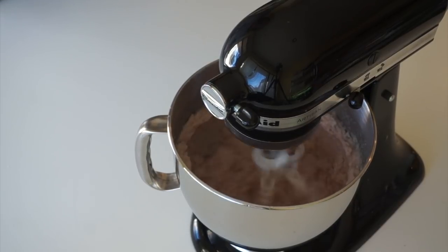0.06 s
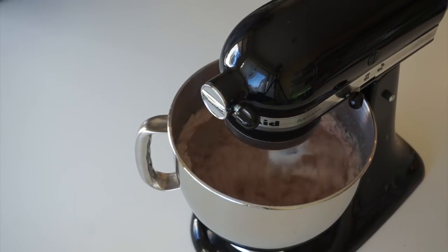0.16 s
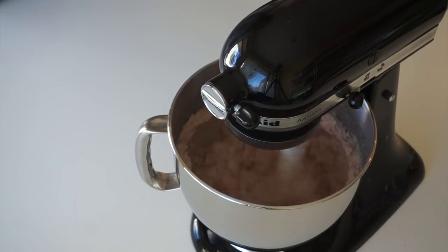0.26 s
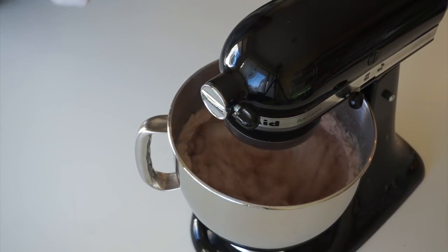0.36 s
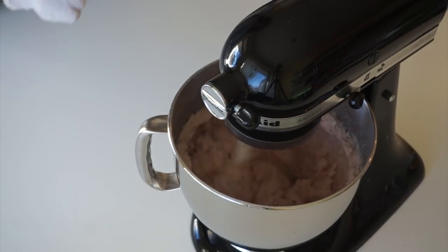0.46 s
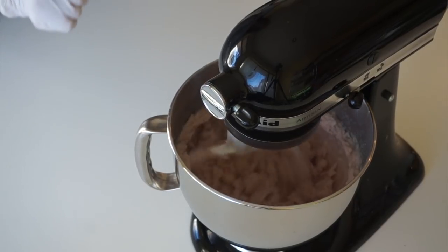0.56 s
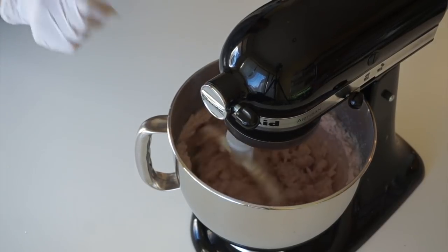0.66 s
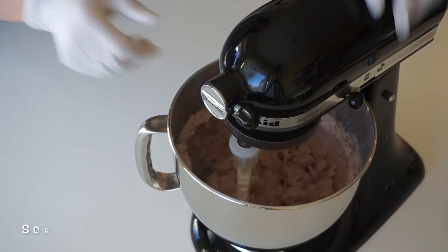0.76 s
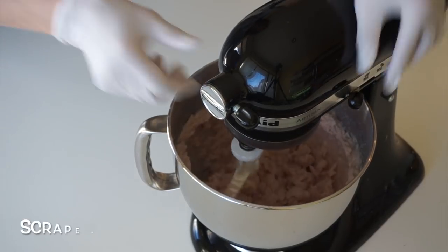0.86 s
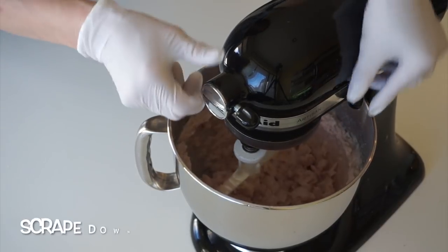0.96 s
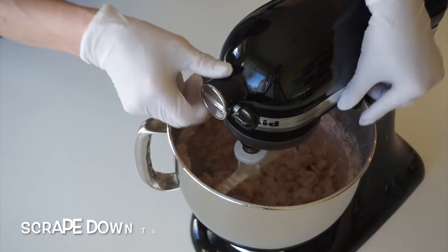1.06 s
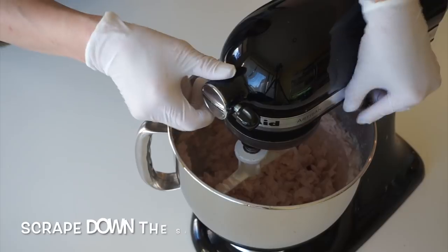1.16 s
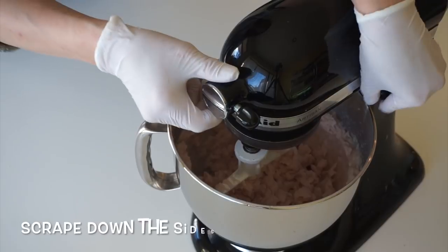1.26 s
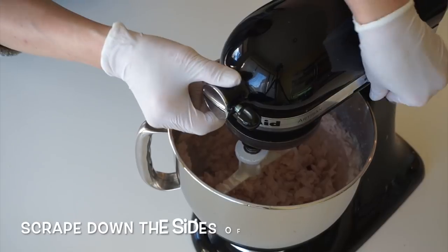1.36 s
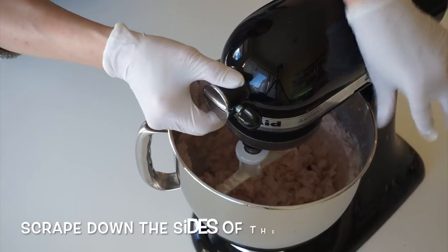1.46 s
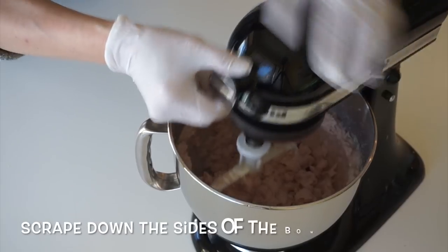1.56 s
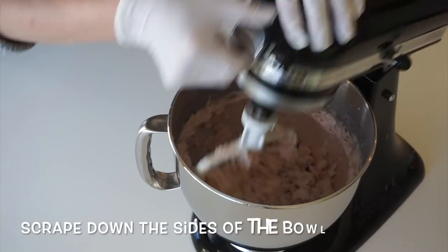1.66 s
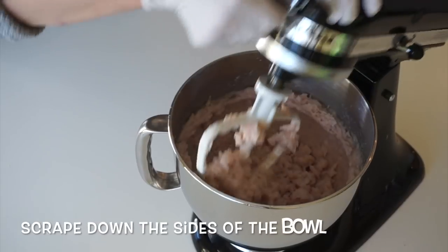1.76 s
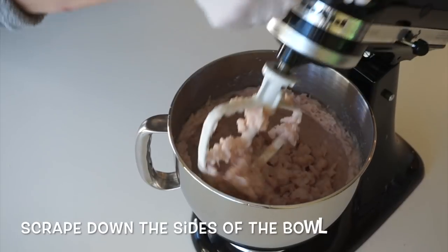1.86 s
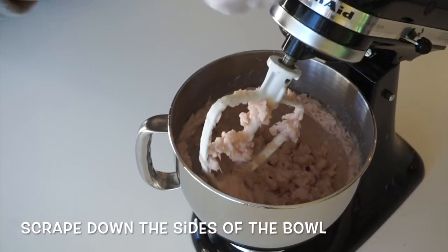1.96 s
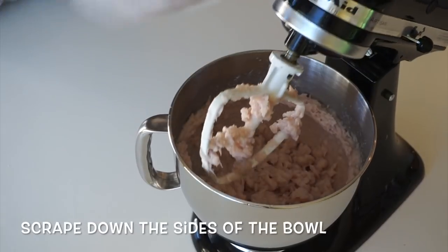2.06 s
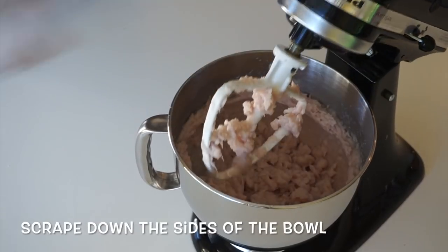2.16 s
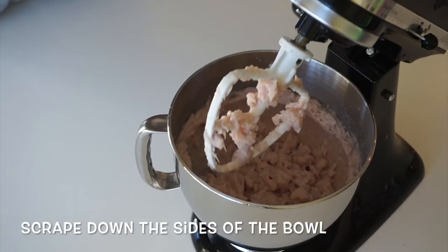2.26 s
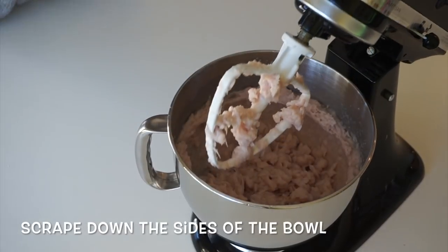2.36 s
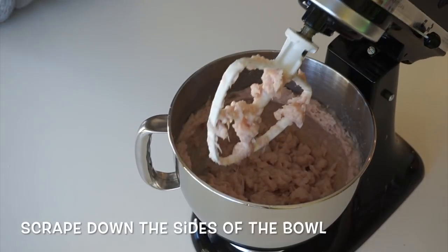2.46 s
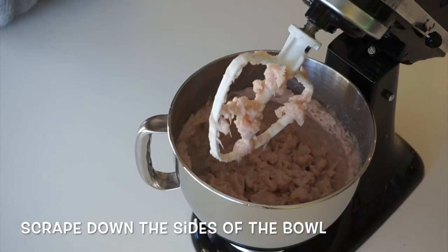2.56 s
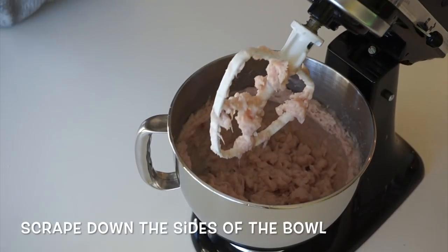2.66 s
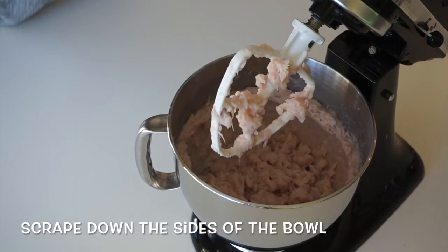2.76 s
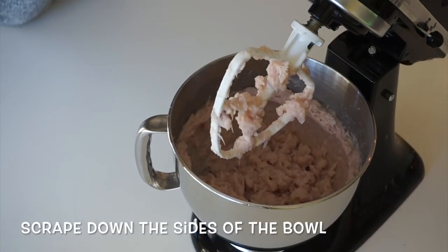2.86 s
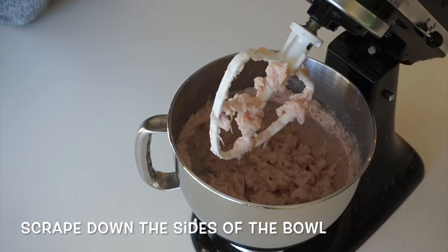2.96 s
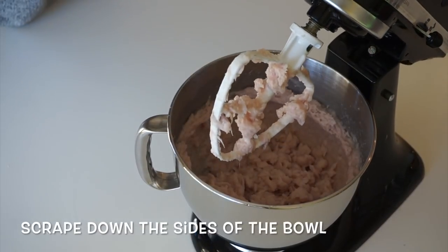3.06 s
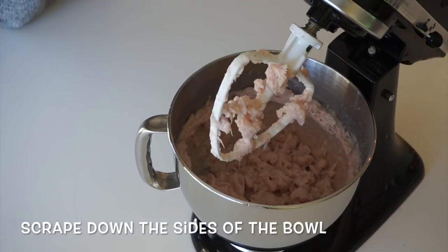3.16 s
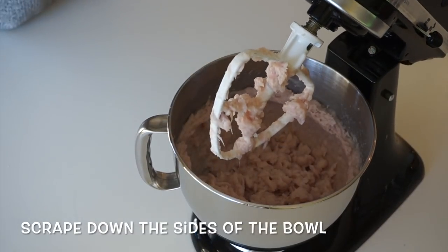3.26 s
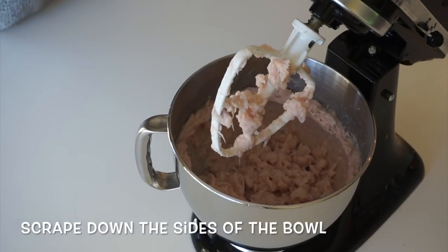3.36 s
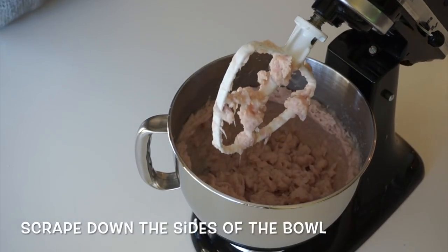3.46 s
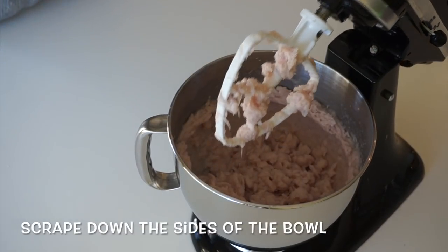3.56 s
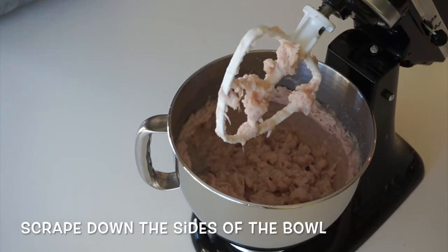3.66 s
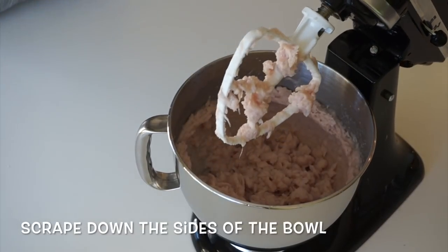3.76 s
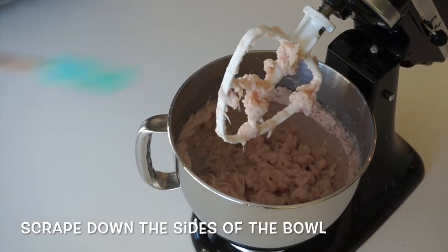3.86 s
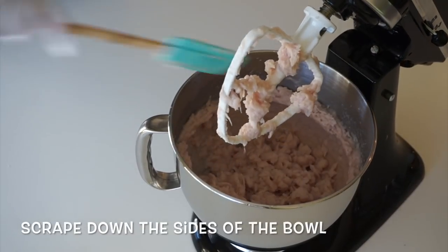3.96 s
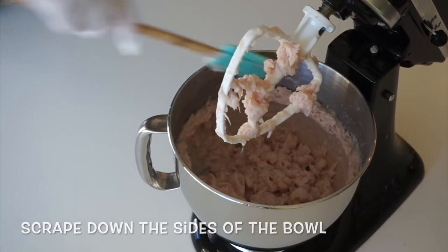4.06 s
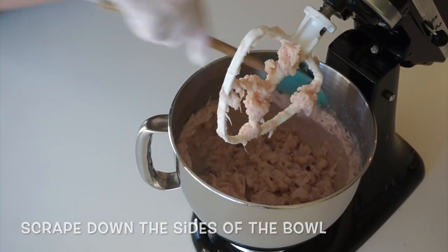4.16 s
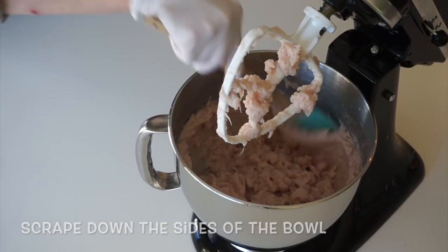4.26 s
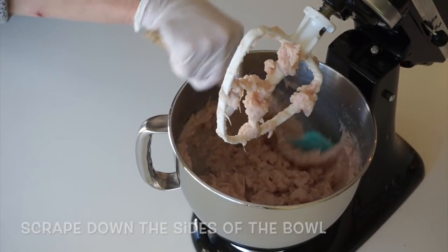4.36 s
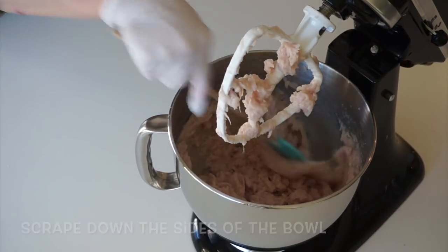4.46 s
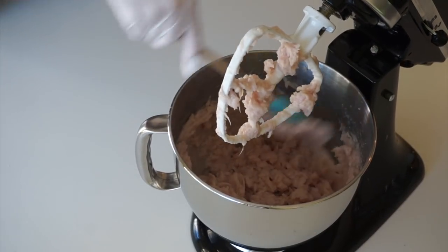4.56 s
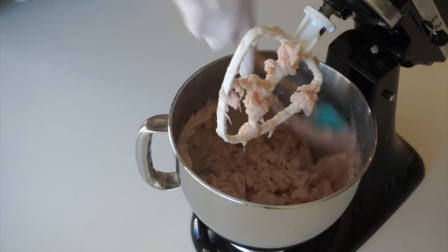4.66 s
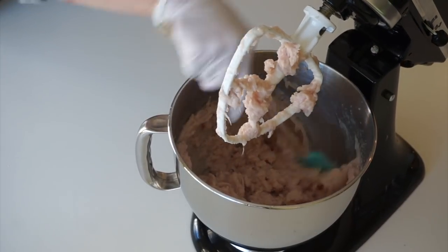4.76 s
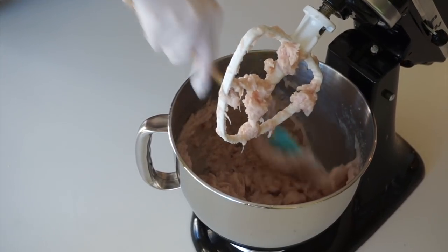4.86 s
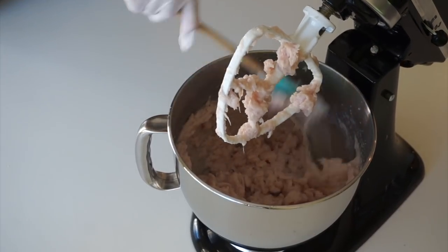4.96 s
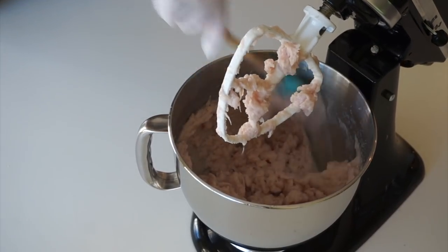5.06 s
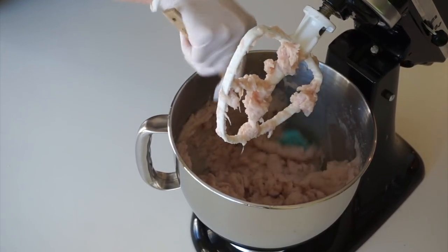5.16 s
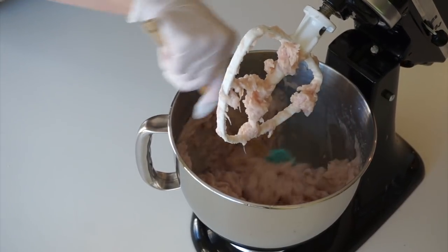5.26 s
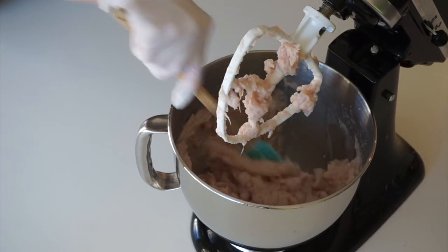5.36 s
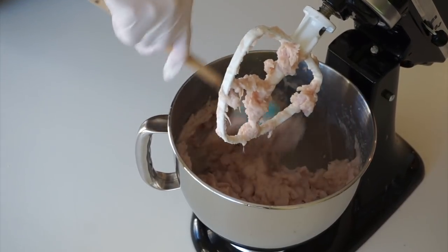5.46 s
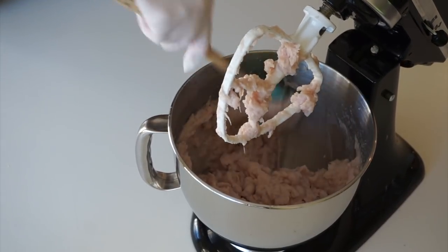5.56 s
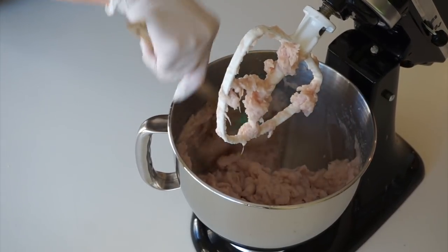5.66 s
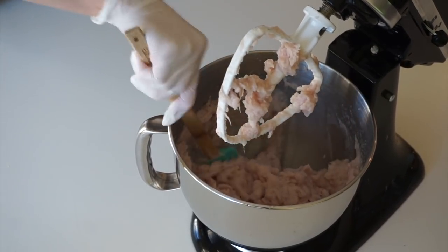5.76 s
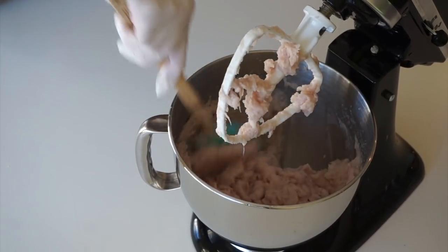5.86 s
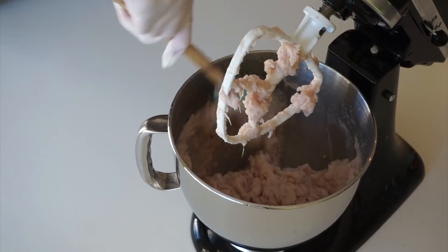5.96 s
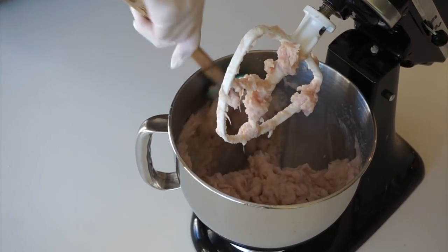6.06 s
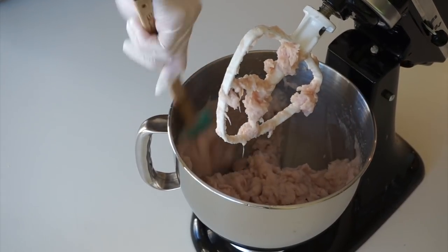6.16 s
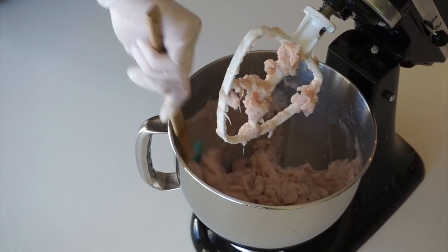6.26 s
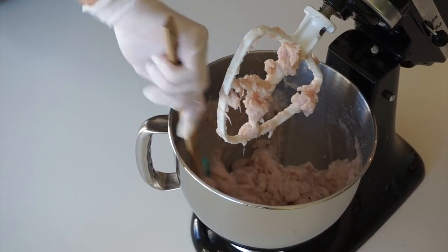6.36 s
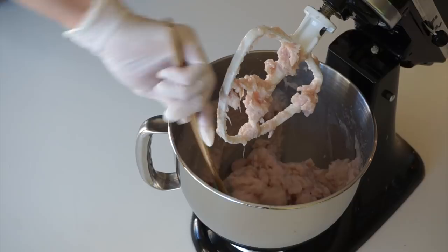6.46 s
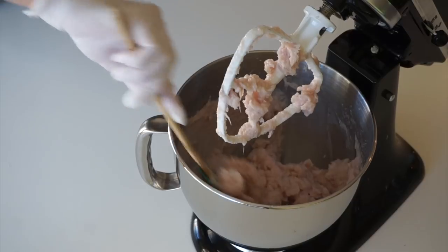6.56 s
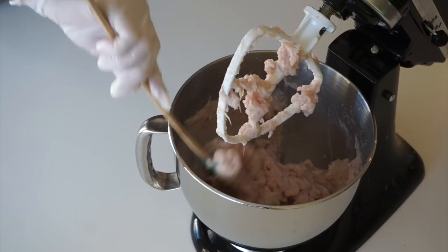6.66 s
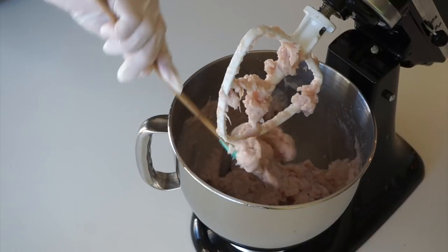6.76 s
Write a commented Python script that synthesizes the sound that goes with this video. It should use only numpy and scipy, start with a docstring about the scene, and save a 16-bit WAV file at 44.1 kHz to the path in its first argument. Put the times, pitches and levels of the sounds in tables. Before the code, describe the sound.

Close mixer grind runs down to a stop, followed by metallic latch clacks, dull counter knocks, and short wet spatula scrapes in a bowl.

```python
"""A stand mixer labours through thick paste close by; its lever clicks down to off and the gears coast to rest.
The head is unlocked and tilted back with clacks and pings, something knocks farther along the counter,
and a rubber spatula scrapes sticky paste off the steel bowl in short strokes. A small, hard kitchen answers.
Shaft tones and coloured grains make the motor, noise bursts and decaying modes the blows,
clumped grains the scraping and short noise bursts the snapping paste; a close pair of microphones hears the room."""
import sys
import numpy as np
from scipy import signal
from scipy.fft import rfft, irfft, next_fast_len
from scipy.io import wavfile
from scipy.ndimage import map_coordinates

SR = 44100
rng = np.random.default_rng(int(sys.argv[2]) if len(sys.argv) > 2 else 0)


def to_wav(sig):
    """Store sig (one row per channel, or 1-D mono) as 16-bit WAV at the path in sys.argv[1].

    Samples outside -1..1 are clipped; the rate is SR.
    """
    pcm = np.clip(np.atleast_2d(sig), -1, 1) * 32767
    pcm = np.round(pcm).astype(np.int16)
    wavfile.write(sys.argv[1], SR, pcm.T)  # frames by channels


N = 299880

# speed of the motor shaft: (time [s], speed [turns/s])
SHAFT_SPEED = [(0, 61), (.39, 61), (.6, 48), (.8, 30), (.95, 8)]
# gear tones at full speed: (frequency [Hz], relative level [dB])
GEAR_TONES = [(845.2, -48), (909.8, -46), (1044, -50), (1130, -54), (1179, -55), (1330, -47), (1577, -54),
              (1642, -54), (1809, -55), (1911, -53), (1981, -55), (2191, -58), (2433, -53), (2557, -55),
              (3128, -63), (3176, -62)]
# shaft tones at full speed: (frequency [Hz], relative level [dB])
SHAFT_TONES = [(86.1, -81.5), (150.7, -73.5), (183.0, -69.5), (296.1, -69), (339.1, -67), (382.2, -60)]
# gearbox under load: (frequency [Hz], relative level [dB])
LOADED_GEARS = [(59, -66.5), (100, -44), (180, -35), (252, -31.5), (375, -27), (461, -26.5), (595, -8.5),
                (732, -19.5), (819, -5.5), (930, 3), (1180, -9), (1340, -3.5), (1410, -11), (1970, -10),
                (4500, -23), (5850, -73), (9900, -120)]
# gears running loose: (frequency [Hz], relative level [dB])
LOOSE_GEARS = [(180, -70), (300, -30), (554, -17), (740, -19.5), (828, -15.5), (1050, -27), (1280, -7),
               (1470, -10), (1610, -1.5), (2430, -2.5), (2760, -7.5), (3130, -10.5), (6000, -25),
               (7800, -46), (13200, -120)]
# hiss of brushes and fan: (frequency [Hz], relative level [dB])
BRUSH_HISS = [(2060, -26), (3500, -2), (5070, -2), (5730, 0), (6700, -3.5), (7790, 2), (8450, -8.5),
              (9710, -2), (10500, -9), (13100, -7), (14000, -13)]
# lever detents, lock and hinge of the head: (time [s], thud [dB], body [dB], clack [dB], edge [dB],
# main resonance [Hz], rattle t60 [s]), levels relative
HEAD_CLACKS = [(0.3935, -47, -57, -30, -27.5, 8600, 0.05), (0.559, -48.5, -38, -39, -56, 3130, 0.013),
               (0.598, -56, -34.5, -32, -27.5, 7800, 0.031), (0.937, -51.5, -34.5, -30, -37.5, 3880, 0.051),
               (1.167, -55.5, -43.5, -42, -39, 2570, 0.17), (1.174, -65, -40, -35, -36.5, 2460, 0.092),
               (1.218, -53, -35.5, -35, -67, 2230, 0.059), (1.277, -71, -37, -50, -71, 1950, 0.026),
               (1.365, -75, -51, -22.5, -33.5, 3020, 0.1), (1.408, -67, -62, -35, -38, 3100, 0.039),
               (1.433, -83, -52, -22.5, -50, 2210, 0.028), (1.512, -51.5, -39, -52, -72, 1420, 0.17),
               (1.653, -45, -42, -53, -51, 950, 0.098), (1.666, -45.5, -61, -64, -65, 675, 0.12),
               (1.69, -63, -40, -41.5, -53, 2180, 0.045), (1.72, -50.5, -62, -74, -55, 2250, 0.057),
               (1.842, -60, -64, -57, -57.5, 310, 0.35), (1.967, -54.5, -56, -42, -43, 3820, 0.067),
               (1.996, -50, -41.5, -34.5, -42.5, 4700, 0.092)]
# modes of the cast head: (frequency [Hz], relative level [dB], t60 [s])
HEAD_MODES = [(279.4, 5, 0.24), (540, 13.5, .25), (1460, 2, 0.3), (1647, 4.5, 0.33), (2194, -7, 0.22),
              (2570, -5, .14), (3000, 7, 0.16), (3740, -5, 0.1), (4100, -4, .25), (4970, 0, 0.18),
              (9600, -10, .16)]
# a small spring rings: (time [s], relative level [dB])
SPRING_PINGS = [(0.9368, -29.5), (1.9669, -35), (1.9974, -32.5)]
# the spring's cluster of close, quickly damped modes: (frequency [Hz], relative level [dB], t60 [s])
SPRING_MODES = [(12120, -5, .06), (12220, -2, .07), (12300, -3, .06), (12450, -3, .06), (12680, -4, .05),
                (12900, -6, .04)]
# dull knocks on the counter: (time [s], thud [dB], body [dB], clack [dB], edge [dB],
# main resonance [Hz], rattle t60 [s]), levels relative
COUNTER_KNOCKS = [(3.626, -43, -47.5, -52, -56.5, 616, 0.15), (3.64, -43, -43, -71, -66, 740, 0.13),
                  (3.688, -44, -48.5, -58, -68, 710, 0.1), (3.817, -41, -59, -73, -78, 567, 0.079),
                  (3.85, -48.5, -48, -67, -75, 480, 0.077)]
# thud, body, clack and edge of every blow: (low edge [Hz], high edge [Hz])
BLOW_BANDS = [(270, 960), (900, 2700), (2300, 5660), (5200, 12000)]
# metal sliding in lock and hinge: (frequency [Hz], relative level [dB])
HINGE_COLOUR = [(200, -48), (500, -38), (1100, -9.5), (1700, -2.5), (2150, 7.5), (2600, -4), (4500, -8),
                (6500, -11.5), (14000, -13)]
# spatula strokes: (time [s], length [s], push on the bowl [dB], rubbing [dB], wet fizz [dB],
# growth of the pressure from start to end [dB], squelch [Hz]), levels relative
SPATULA_STROKES = [(4.138, 0.35, -80, -70, -62, -17, 3400), (4.639, 0.21, -69.5, -65, -64, -1, 2400),
                   (5.07, .1, -70.5, -61.5, -55, -4, 2900), (5.218, 0.2, -64, -61.5, -60.5, -4.5, 2250),
                   (5.658, 0.25, -68, -63.5, -59, 2, 2100), (6.057, 0.24, -72, -66, -68, 10, 2450),
                   (6.361, 0.068, -76, -68, -65.5, -6, 2935), (6.458, 0.16, -68.5, -64, -58.5, -15, 2930)]
# resonances of the paste-damped bowl: (frequency [Hz], width [Hz], relative level [dB])
BOWL_RESONANCES = [(547, 120, -9.5), (844, 105, 1.5), (1080, 103, -4), (1332, 110, 4.5), (2044, 64, -3)]
# rubber rubbing on steel: (frequency [Hz], relative level [dB])
RUB_COLOUR = [(900, -45), (1800, -12.5), (2500, -2.5), (3300, -2.5), (4200, -7), (5100, -13), (7000, -14),
              (14000, -41)]
# wet paste: (frequency [Hz], relative level [dB])
FIZZ_COLOUR = [(2500, -18.5), (4500, 7.5), (6000, 3), (10000, 9.5), (14000, 4)]
# the spatula meets the steel: (time [s], thud [dB], body [dB], clack [dB], edge [dB],
# main resonance [Hz], rattle t60 [s]), levels relative
SPATULA_TAPS = [(4.147, -62.5, -68, -70, -60, 1400, 0.16), (4.644, -57.5, -47.5, -47.5, -50, 2400, 0.051),
                (5.055, -61, -52, -46.5, -53.5, 2940, 0.023), (5.232, -69, -64, -47, -60, 2680, 0.024),
                (5.699, -72, -50, -58, -48, 2230, 0.035), (5.838, -81, -70, -42, -45, 9400, 0.018),
                (6.073, -84, -45.5, -34, -42.5, 3020, 0.027), (6.192, -69, -44, -42, -49, 1400, 0.045),
                (6.551, -89, -69, -43.5, -66, 3100, 0.018)]
# modes of the bowl's rim: (frequency [Hz], relative level [dB], t60 [s], held to 0.4 s at most)
RIM_MODES = [(527, 4, 0.49), (821, 18, 0.079), (1383, 5, 0.34), (2520, 9, 0.1), (2930, -13, 0.21),
             (2870, 0.5, 0.15), (3200, -9, 0.083), (4030, -10, .16)]
# air pockets snap in the paste: (time [s], relative level [dB], pitch [Hz])
PASTE_SNAPS = [(4.3863, -35, 4570), (4.4333, -40, 11500), (4.5765, -36, 13000), (4.7491, -32, 11800),
               (4.872, -30, 11170), (5.2086, -33, 8070), (5.2692, -29, 4140), (5.284, -34, 7160),
               (5.2934, -33, 7910), (5.3428, -30, 3730), (5.3882, -24, 4740), (5.3991, -30, 6460),
               (5.4235, -21, 8900), (5.647, -32.5, 3860), (5.7324, -27.5, 10200), (5.8398, -29.5, 9360),
               (5.9167, -24.5, 11100), (6.1235, -27, 11700), (6.4723, -24.5, 4970)]
# background air: (frequency [Hz], relative level [dB])
AIR_COLOUR = [(18, -71), (30, -27), (65, -35.5), (383, -10), (849, -5), (1280, -5.5), (1490, -1),
              (1880, -4.5), (2440, -3.5), (3680, -5), (5010, -7), (11400, -8.5), (14000, -11)]
# decay of the kitchen: (frequency [Hz], t60 [s])
KITCHEN_DECAY = [(150, 0.33), (400, 0.61), (1000, 0.5), (3000, 0.49), (7000, 0.41), (10000, 0.37),
                 (13000, 0.45)]
# side signal of the microphone pair in a diffuse field: (frequency [Hz], level [dB])
STEREO_WIDTH = [(100, -14), (500, -9), (1100, -6), (2000, -6), (4000, -12), (9000, -35)]
# modes of the counter: (frequency [Hz], relative level [dB], t60 [s])
COUNTER_MODES = [(88, -12, 0.13), (145, -12.5, 0.1), (200, -14.5, .12), (291, 1, 0.091), (414, -4, 0.13),
                 (519.6, -5, 0.17), (735, -4, 0.11), (923, -3, 0.1), (1301, 1, 0.092), (1572, 6, 0.1),
                 (1675, 0, 0.087), (2310, -3, 0.13)]
# metal slides in the lock and hinge: (time [s], length [s], level [dB])
METAL_SLIDES = [(1.156, 0.043, -43.5), (1.347, 0.11, -39.5), (1.583, 0.17, -52.5)]
# faint rustles between the jobs: (time [s], length [s], level [dB])
FAINT_RUSTLES = [(2.117, 0.76, -71.5), (3.06, .06, -65.5), (3.314, 0.029, -66), (3.47, 0.055, -63)]

AIR_DB, TOP_HZ = -68, 13750  # background level; upper band limit
SWITCH_OFF_S, REST_S = 0.36, 0.94  # the lever cuts the drive; the gears stand still
STOP_S = 0.12  # friction brings the gears to rest over this time
# the beater bites into the paste: period, first bite, swing of the load either way
SWEEP_S, FIRST_SWEEP_S, SWEEP_DB = 0.115, 0.0085, 2
# gear drive: level, drop at switch-off, its time, fade from switch-off on
DRIVE_DB, UNLOAD_DB, UNLOAD_S, RUN_DOWN_DB_PER_S = -37.5, 3.5, 0.022, 75
# loose teeth: level under load, gain when coasting, time to work loose
CHATTER_DB, SLACK_DB, SLACK_S = -45, 6.5, 0.14
HISS_DB = -44.5  # brushes and fan at full speed
CHATTER_POWER, HISS_POWER = 0.4, 0.59  # amplitude goes with speed to these powers
SLIDE_ATTACK_S, SLIDE_RELEASE_DB_PER_S = 0.028, 350
RUSTLE_ATTACK_S, RUSTLE_RELEASE_DB_PER_S = 0.03, 150
STROKE_ATTACK_S, STROKE_RELEASE_DB_PER_S = 0.041, 269  # the blade settles on the steel and lifts off
PRESSURE_WOBBLE_DB = 2.9  # scale of the hand's uneven pressure
SQUELCH_DB, SQUELCH_WIDTH = 1, 0.098  # air pocket under the blade: gain, bandwidth as a share of its pitch
SOFT_BELOW_HZ = 2800  # a blow that sounds lower than this is a softer contact and starts more slowly
# tiny snaps under the blade: rate, lift over the stroke's rubbing before the paste level, middle pitch
TINY_SNAPS_PER_S, TINY_SNAP_DB, TINY_SNAP_HZ = 40, 20, 5000
MOTOR_PAN_DB, HEAD_PAN_DB, BOWL_PAN_DB, KNOCK_PAN_DB = -0.8, -0.5, 0.4, -0.7  # left minus right


def amp(db):
    """Decibels to gain."""
    return 10 ** (np.asarray(db) / 20)


def unit(x):
    """Scale to rms 1."""
    return x / np.sqrt(np.mean(x ** 2) + 1e-20)


def along(points, hz):
    """(Hz, value) points read on a log frequency axis."""
    f, v = np.transpose(points)
    return np.interp(np.log(hz + 1), np.log(f + 1), v)


def wobble(rate):
    """A random curve of straight segments, rate knots a second."""
    knots = rng.standard_normal(int(N * rate / SR) + 4)
    return map_coordinates(knots, [np.arange(N) * rate / SR], order=1)


def filtered(x, response):
    """x times a response of frequency."""
    n = x.shape[-1]
    m = next_fast_len(n + 8192)  # padding keeps the tail from wrapping round
    return irfft(rfft(x, m) * response(np.fft.rfftfreq(m, 1 / SR)), m)[..., :n]


def coloured(x, spectrum):
    """x shaped by the given spectrum, at rms 1."""
    return unit(filtered(x, lambda hz: amp(along(spectrum, hz))))


def grains(rate, spread_db):
    """Random impulses, rate a second, of widely scattered sizes, at rms 1."""
    when, size, sign = rng.random((int(rate * N / SR), 3)).T
    size = amp(spread_db * 3.5 * size) * np.sign(sign - .5)
    return unit(np.bincount((when * N).astype(int), size, N))


def ring(modes, t):
    """Decaying modes, struck at new strengths each time."""
    hz, db, t60 = np.transpose(modes)[:, :, None]
    swing = amp(db + rng.normal(0, 2, db.shape) - 60 * t / np.clip(t60, .01, .4))
    return np.sum(swing * np.sin(2 * np.pi * (hz * t + rng.random(hz.shape))), axis=0)


def add(track, s, sound):
    """Mix a sound in at time s."""
    part = track[max(round(s * SR), 0):][:len(sound)]
    part += sound[:len(part)]


def gesture(start, length, attack, release_db_per_s):
    """Gain of one rubbing movement: it rises, holds for its length and dies away."""
    t = np.arange(N) / SR - start
    return np.clip(t / attack, 0, 1) * amp(-release_db_per_s * np.maximum(t - length, 0))


def blows(rows, modes, level_db, ring_db, attack, crack_db, resonance_db, octaves=0.19):
    """Each blow is a crack and a short rattle around one resonance; its colour decides which modes ring."""
    out, t = np.zeros(N), np.arange(SR * 3 // 10) / SR
    hz = np.fft.rfftfreq(len(t), 1 / SR)
    shapes = np.array([(hz / lo) ** 6 / (1 + (hz / lo) ** 6) / (1 + (hz / hi) ** 10) for lo, hi in BLOW_BANDS])
    centres = np.sqrt(np.prod(BLOW_BANDS, axis=1))
    for s, *colour, pitch_hz, t60 in rows:
        distance = np.log2((hz + 1) / pitch_hz) / octaves
        band_power = (shapes * (1 + amp(resonance_db) / (1 + distance ** 2))) ** 2
        power = amp(colour) ** 2 @ (band_power / band_power.mean(axis=1, keepdims=True))
        noise = irfft(rfft(rng.standard_normal(len(t))) * np.sqrt(power), len(t))
        crack = amp(crack_db - 60 * t / 0.011)
        rattle = noise * (amp(-60 * t / max(t60, .004)) + crack)
        rise = attack * (SOFT_BELOW_HZ / min(pitch_hz, SOFT_BELOW_HZ)) ** 2
        excited = [(f, db + along(list(zip(centres, colour)), f), life) for f, db, life in modes]
        blow = rattle + amp(ring_db) * ring(excited, t)
        add(out, s, amp(level_db) * blow * (1 - np.exp(-t / rise)))
    # small objects radiate little bass
    return signal.sosfilt(signal.butter(1, 200, "high", fs=SR, output="sos"), out)


def spread(pair):
    """Two unrelated signals as a close pair of microphones hears a diffuse field."""
    side = filtered(pair[1], lambda hz: amp(along(STEREO_WIDTH, hz)))
    return np.array([pair[0] + side, pair[0] - side])


def kitchen(x):
    """Diffuse stereo answer of the walls; each frequency dies at its own speed."""
    hz, t, z = signal.stft(rng.standard_normal((2, SR * 3 // 4)), SR, nperseg=256)
    decay = amp(-60 * t / along(KITCHEN_DECAY, hz)[:, None]) * (1 - np.exp(-t / 0.00057))
    tail = signal.istft(z * decay, SR, nperseg=256)[1]
    tail = tail / np.linalg.norm(tail[0])
    return spread(signal.fftconvolve(x[None], tail, axes=1)[:, :N])


def placed(x, pan_db, room_db):
    """A source a little off centre; more room against the direct sound sets it farther away."""
    return (x + amp(room_db) * kitchen(x)) * amp(np.array([[pan_db], [-pan_db]]) / 2)


def background_air():
    """Faint coloured noise from all round the microphones."""
    return amp(AIR_DB) * spread(coloured(rng.standard_normal((2, N)), AIR_COLOUR))


def effort(speed):
    """Gains of drive, chatter and hiss: the load swings with the beater, then falls as the shaft coasts."""
    t = np.arange(N) / SR
    coasting = np.maximum(t - SWITCH_OFF_S, 0)
    unloaded, slack = np.minimum(coasting / UNLOAD_S, 1), np.minimum(coasting / SLACK_S, 1)
    bite_db = SWEEP_DB * np.cos(2 * np.pi * (t - FIRST_SWEEP_S) / SWEEP_S) * (1 - unloaded)
    pace, turning = speed / speed[0], np.clip((REST_S - t) / STOP_S, 0, 1)
    drive = amp(DRIVE_DB + bite_db - UNLOAD_DB * unloaded - RUN_DOWN_DB_PER_S * coasting)
    chatter = amp(CHATTER_DB - bite_db + SLACK_DB * slack) * pace ** CHATTER_POWER
    return turning * np.array([drive, chatter, amp(HISS_DB) * pace ** HISS_POWER])


def motor(whine_db=-1.0, hum_db=-2, slap_db=-1.0):
    """Gear teeth grind under load and chatter when coasting; the tones follow the shaft."""
    speed = np.interp(np.arange(N) / SR, *np.transpose(SHAFT_SPEED))
    drive, chatter, hiss = effort(speed)
    turns = np.cumsum(speed) / SR
    # the paste drags unevenly, so the tones waver in pitch and each swells on its own
    pace = speed / SHAFT_SPEED[0][1] * (1 + .003 * wobble(40))
    phase = np.cumsum(pace[:SR]) / SR
    tones = np.zeros(N)
    for lines, level_db in ((GEAR_TONES, whine_db), (SHAFT_TONES, hum_db)):
        for hz, db in lines:
            swell_db = np.interp(np.linspace(0, 25, SR), np.arange(26), rng.normal(0, 2, 26))
            tone = np.sqrt(2) * np.sin(2 * np.pi * (hz * phase + rng.random()))
            tones[:SR] += amp(db + level_db + swell_db) * tone
    tones *= drive / drive[:SR // 3].mean()
    # the mesh tightens twice and five times in each turn
    mesh = (1 + .35 * np.cos(10 * np.pi * turns)) * (1 + .3 * np.cos(4 * np.pi * turns))
    grind = coloured(mesh * (grains(700, 3.7) + 0.67 * rng.standard_normal(N)), LOADED_GEARS)
    # loose teeth slap twice a turn
    backlash = np.exp(-1.2 * (2 * turns % 1)) * amp(slap_db * wobble(87.7))
    loose = coloured(backlash * (grains(1500, 2.0) + 0.61 * rng.standard_normal(N)), LOOSE_GEARS)
    # the brushes hiss louder once a turn
    once_a_turn = 1 + .4 * np.cos(2 * np.pi * turns)
    sparks = coloured(once_a_turn * (grains(2500, 3) + rng.standard_normal(N)), BRUSH_HISS)
    return tones + drive * grind + chatter * loose + hiss * sparks


def head(spring_db=-10, blow_db=-1.0, ring_db=-21, resonance_db=3):
    """Levers click, metal slides in the lock and hinge as grains, and a spring's close modes ping at the stops."""
    out = blows(HEAD_CLACKS, HEAD_MODES, blow_db, ring_db, attack=.0003, crack_db=2, resonance_db=resonance_db)
    sliding = sum(amp(db) * gesture(s, length, SLIDE_ATTACK_S, SLIDE_RELEASE_DB_PER_S)
                  for s, length, db in METAL_SLIDES)
    out += sliding * coloured(grains(900, 5.1), HINGE_COLOUR)
    t = np.arange(SR // 3) / SR
    for s, db in SPRING_PINGS:
        add(out, s, amp(db + spring_db) * ring(SPRING_MODES, t))
    return out


def rustles():
    """Soft, crinkly brushes of dense grains, centred and without room."""
    level = sum(amp(db) * gesture(s, length, RUSTLE_ATTACK_S, RUSTLE_RELEASE_DB_PER_S)
                for s, length, db in FAINT_RUSTLES)
    colour = [(1000, -17), (3200, -2.5), (6000, -5), (13000, 9)]  # (frequency [Hz], relative level [dB])
    return level * coloured(grains(3000, 2.5), colour)


def knocks():
    """Dull blows set the modes of the counter ringing."""
    return blows(COUNTER_KNOCKS, COUNTER_MODES, level_db=-1.5, ring_db=-8.0, attack=0.00011,
                 crack_db=-8.0, resonance_db=4.5)


def bowl(hz):
    """Response of the damped steel bowl: resonances of alternating sign."""
    return sum((-1) ** k * amp(db) * 1j * hz * width / (centre * centre - hz * hz + 1j * hz * width)
               for k, (centre, width, db) in enumerate(BOWL_RESONANCES))


def spatula(tick_db=-3):
    """Rubber slips over the bowl in tiny jerks, louder as the hand presses, while the wet paste fizzes and tears."""
    # the blade sticks and lets go, so the grains come in clumps
    grip = amp(3.2 * wobble(70))
    # larger tears tick in the blade and the bowl at once
    tears = amp(tick_db) * grains(110, 5)
    body = unit(filtered(grip * grains(600, 8.1) + tears, bowl))
    slips = coloured(grip * grains(600, 5.5) + tears, RUB_COLOUR)
    wet = coloured(grip * grains(2500, 3.3), FIZZ_COLOUR)
    t, uneven_db = np.arange(N) / SR, PRESSURE_WOBBLE_DB * wobble(18)
    out = blows(SPATULA_TAPS, RIM_MODES, level_db=-0.5, ring_db=-18, attack=0.00091,
                crack_db=-4.0, resonance_db=7)
    for s, length, push_db, rub_db, fizz_db, growth_db, squelch_hz in SPATULA_STROKES:
        pressure_db = growth_db * (np.clip((t - s) / length, 0, 1) - .5) + uneven_db
        # the pocket of air under the blade resonates
        pocket = signal.lfilter(*signal.iirpeak(squelch_hz, 1 / SQUELCH_WIDTH, SR), slips)
        rubbing = unit(slips + amp(SQUELCH_DB) * pocket)
        scrape = amp(push_db + pressure_db) * body
        scrape += amp(rub_db + pressure_db / 2) * rubbing
        scrape += amp(fizz_db + uneven_db) * wet
        out += gesture(s, length, STROKE_ATTACK_S, STROKE_RELEASE_DB_PER_S) * scrape
    return out


def paste(level_db=-11.0, life=0.0009, octaves=0.93):
    """Air pockets burst in about a millisecond, each around its pitch; tiny ones crackle at random under the blade."""
    out, t = np.zeros(N), np.arange(SR // 50) / SR
    tiny = []
    for s, length, _, rub_db, *_ in SPATULA_STROKES:
        when, size, pitch = rng.random((round(TINY_SNAPS_PER_S * length), 3)).T
        snap_db = rub_db + TINY_SNAP_DB + 10 * (size - .5)
        tiny += zip(s + length * when, snap_db, TINY_SNAP_HZ * 2 ** (2 * pitch - 1))
    for s, db, pitch_hz in list(PASTE_SNAPS) + tiny:
        burst = rng.standard_normal(len(t)) * np.exp(-t / life)
        snap = filtered(np.pad(burst, (32, 0)),
                        lambda hz: (1 + (np.log2((hz + 1) / pitch_hz) / octaves) ** 2) ** -1.5)
        add(out, s, amp(db + level_db) * unit(snap) * np.sqrt(life / t[-1]))
    return out


def scene():
    """The mixer and bowl are near the microphones; the knocks come from farther along the counter."""
    out = background_air() + placed(motor(), MOTOR_PAN_DB, room_db=-4.0)
    out += placed(head(), HEAD_PAN_DB, room_db=-0.3)
    out += rustles()
    out += placed(knocks(), KNOCK_PAN_DB, room_db=0.3)
    out += placed(spatula() + paste(), BOWL_PAN_DB, room_db=-5.0)
    return out


def record(dry, low_cut_hz=60):
    """The camera's microphones lose the deep bass and all but nothing passes above the band limit."""
    thin = signal.sosfilt(signal.butter(2, low_cut_hz, "high", fs=SR, output="sos"), dry)
    return filtered(thin, lambda hz: 1 / np.sqrt(1 + (hz / TOP_HZ) ** 260))


dry = scene()
out = record(dry)
to_wav(out)
```